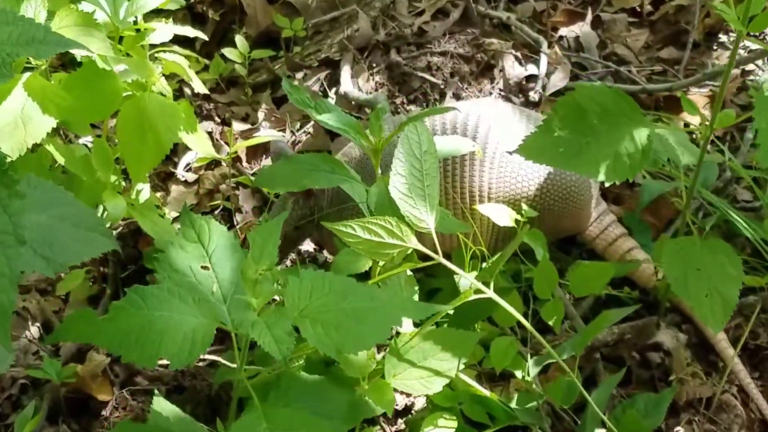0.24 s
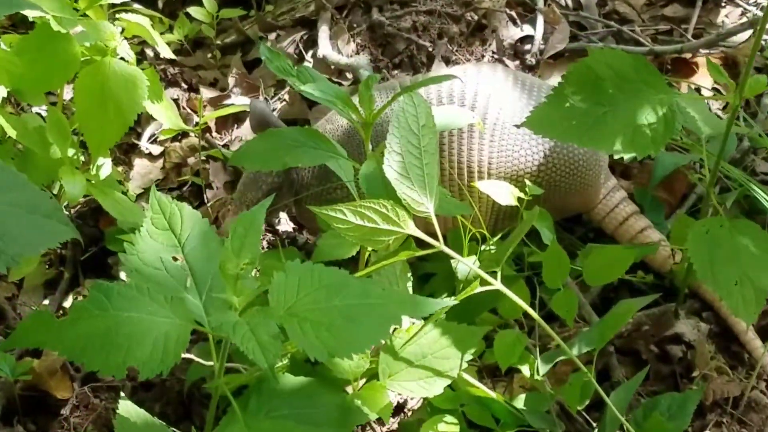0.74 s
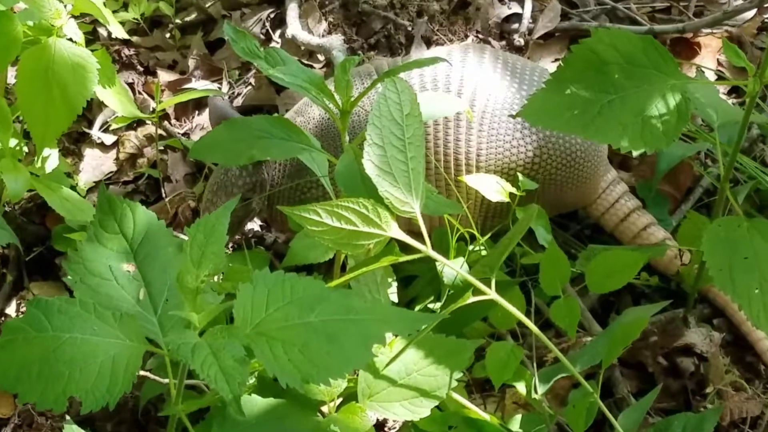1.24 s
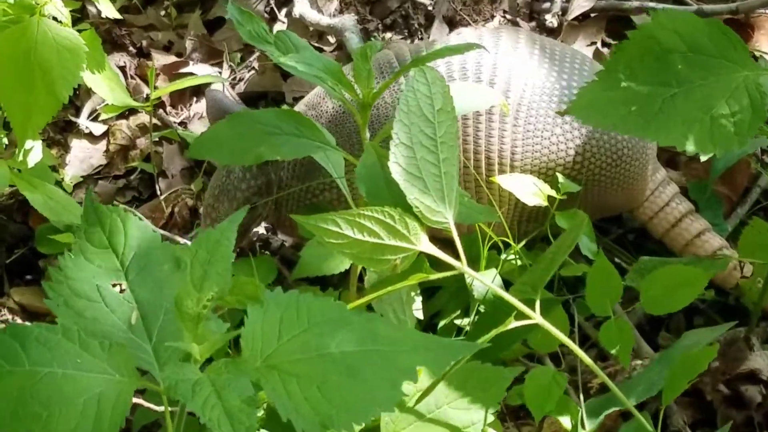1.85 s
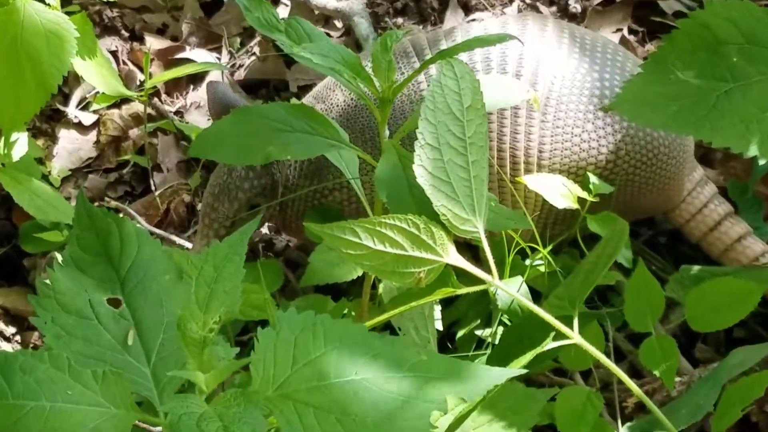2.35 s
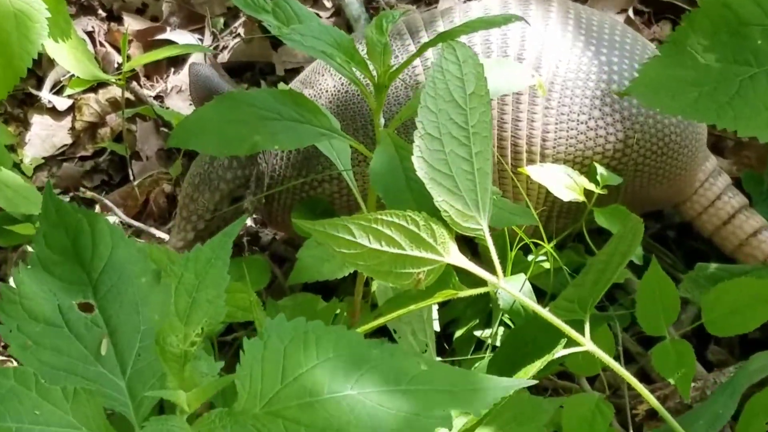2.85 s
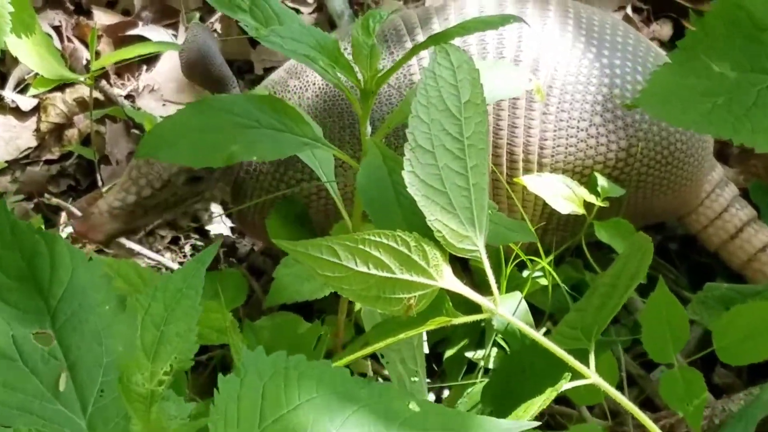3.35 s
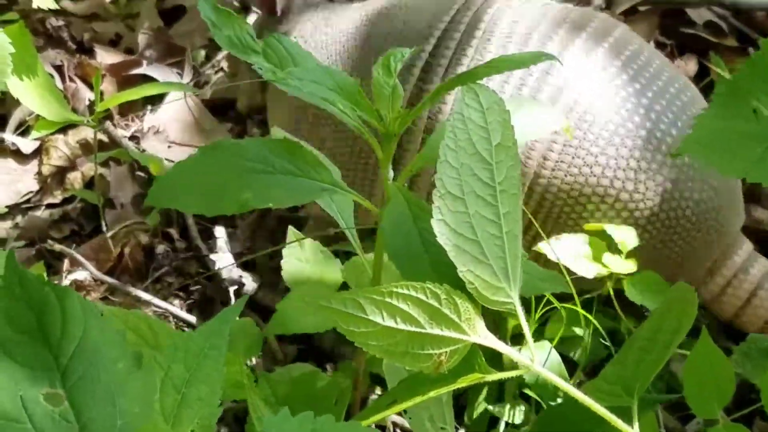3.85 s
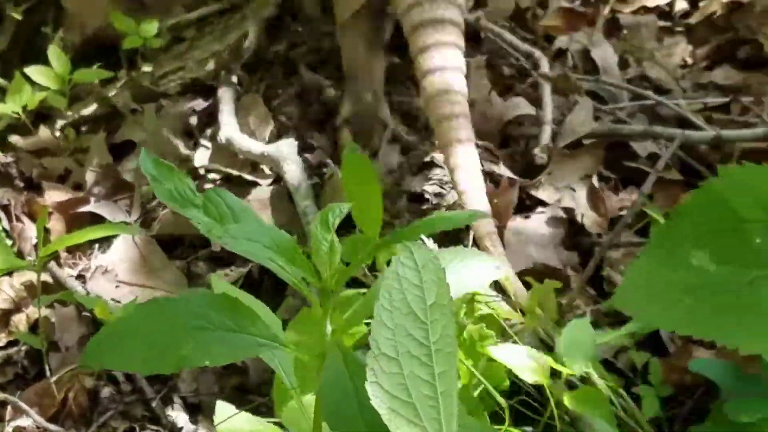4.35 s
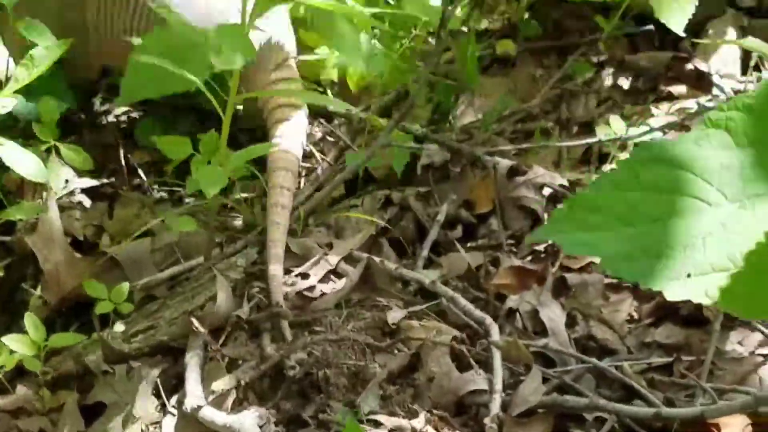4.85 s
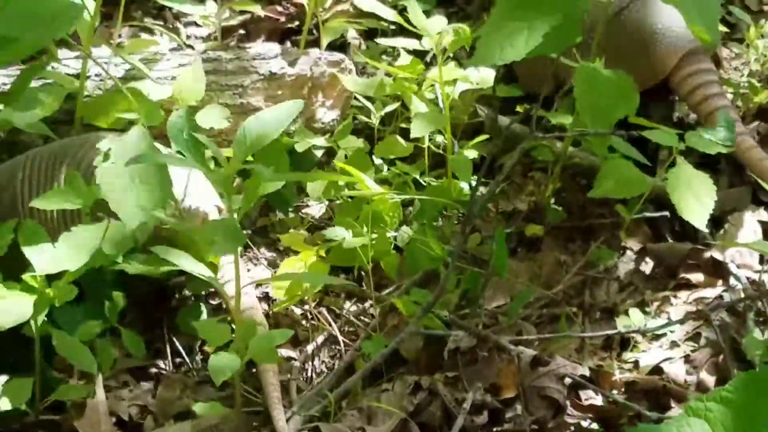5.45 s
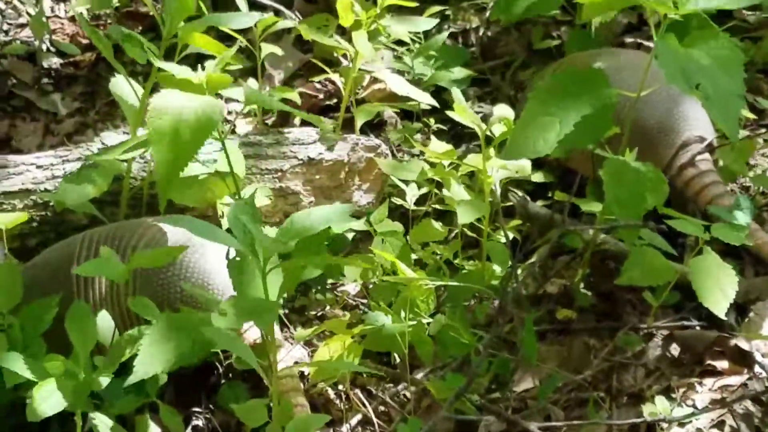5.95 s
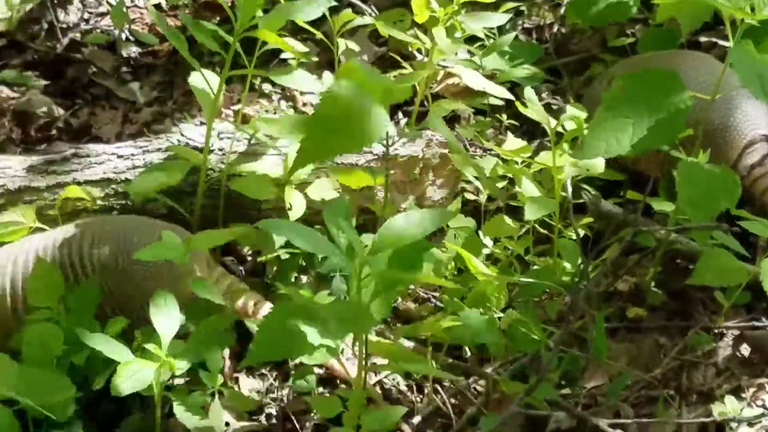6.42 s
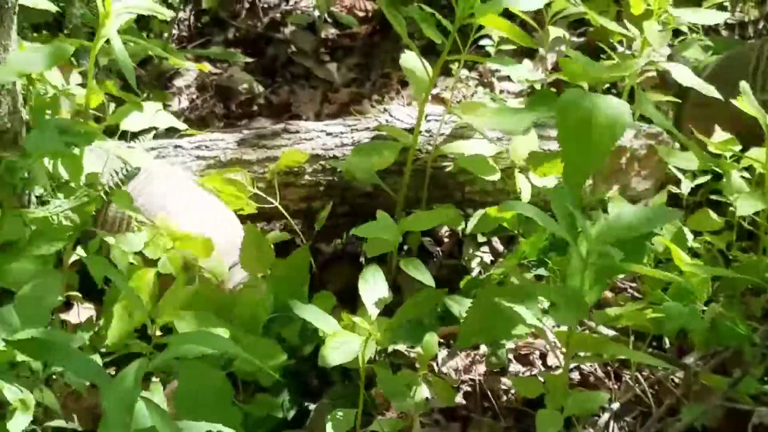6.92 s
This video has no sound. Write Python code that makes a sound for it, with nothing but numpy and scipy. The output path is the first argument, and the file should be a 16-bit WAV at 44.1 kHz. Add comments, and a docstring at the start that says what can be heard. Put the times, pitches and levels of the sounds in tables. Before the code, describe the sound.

Two armadillos root through dry leaf litter in a wood, a metre or two from a hand-held microphone. The leaves scrape and crackle in uneven bursts, dotted with small snaps of stems and twigs. The rustling grows busier about halfway, then carries on as the animals move off through the plants. Behind it are a faint woodland murmur, light puffs of wind and two very faint passing hums.

```python
"""Two armadillos root and shuffle through dry leaf litter, a metre or two from a hand-held microphone pair.
The leaves scrape and crackle in swarms of tiny breaks; stems and twigs snap with a short ring.
There is one tap on the microphone and a few soft knocks. Behind lies the far murmur of the wood;
puffs of wind cross the microphone ports, and two faint low hums, perhaps insects in flight, pass by."""
import sys
import numpy as np
from scipy import signal
from scipy.fft import rfft, irfft
from scipy.io import wavfile
from scipy.ndimage import uniform_filter1d, map_coordinates

SR = 44100
rng = np.random.default_rng(int(sys.argv[2]) if len(sys.argv) > 2 else 0)


def inscribe(sig):
    """Save sig as 16-bit PCM at rate SR to the path in sys.argv[1].

    A 1-D sig is mono; a 2-D sig holds one channel per row.
    Samples are clipped to [-1, 1] before scaling.
    """
    pcm = np.round(np.clip(np.atleast_2d(sig).T, -1, 1) * 32767)
    wavfile.write(sys.argv[1], SR, pcm.astype(np.int16))


N = 316638

# Leaf colour while rooting close by (frequency [Hz], level [dB])
ROOTING_COLOUR = [(180, -21.5), (300, -12), (411, -10.5), (622, -5), (1010, -4.5), (1400, -7), (1890, -2.5),
                  (2270, -3.5), (3440, -8.5), (5380, -10), (7370, -3), (9610, -11.5), (10800, -13),
                  (14300, -6.5), (15800, -12.5)]
# Leaf colour while walking off through the plants (frequency [Hz], level [dB])
WALKING_COLOUR = [(88, -47), (150, -10), (213, -20.5), (321, -8.5), (587, -5.5), (801, -2), (1250, -5),
                  (1930, -2.5), (2960, -11), (4280, -5.5), (5960, -10), (7990, -3), (9900, -18),
                  (12800, -7.5), (15800, -11.5)]
# Bearing of the busier animal (time [s], lag at the left port [ms])
LEFT_LAG = [(0.2, 0.061), (.75, -0.049), (1.25, 0.038), (1.75, -0.079), (2.75, -0.078), (3.3, -0.1),
            (3.75, -0.014), (4.75, 0.077), (5.25, 0.039), (5.75, -0.095), (6.3, -0.1), (7.1, 0.015)]
TURN_S = (3.5, 3.65)   # start and end of the near animal's turn away


def from_db(db):
    """Decibels to amplitude gain."""
    return 10 ** (np.asarray(db) / 20)


def in_time(rows):
    """One automation curve for each column after the time."""
    times, *columns = np.transpose(rows)
    return [np.interp(np.arange(N) / SR, times, column) for column in columns]


def at_hz(points, hz):
    """Read a curve along a log frequency axis."""
    point_hz, values = np.transpose(points)
    return np.interp(np.log(hz), np.log(point_hz), values)


def sides(pan_db):
    """Left and right gains for a left-minus-right level."""
    return from_db(np.array([pan_db / 2, -pan_db / 2]))


def band(x, low_hz, high_hz):
    """Gentle band-pass."""
    return signal.sosfilt(signal.butter(2, [low_hz, high_hz], "band", fs=SR, output="sos"), x)


def drift(rate_hz):
    """Smooth random wander of rms 1."""
    step, settle = 40, 2000
    pole = np.exp(-2 * np.pi * rate_hz * step / SR)
    noise = rng.standard_normal(N // step + settle + 2)
    slow = signal.lfilter([1], [1, -2 * pole, pole * pole], noise)[settle:]
    return np.interp(np.arange(N) / step, np.arange(len(slow)), slow / np.sqrt(np.mean(slow ** 2)))


def stereo_noise(colour):
    """Coloured noise, narrow in the low mids and wide at both extremes; the mono mix has rms 1."""
    # Likeness of left and right (frequency [Hz], correlation [0-1])
    likeness = [(30, .04), (70, .45), (130, .66), (500, .82), (1000, .6), (3000, .5), (12000, 0.2)]
    hz = np.maximum(np.fft.rfftfreq(N, 1 / SR), 1)
    alike = at_hz(likeness, hz)
    mid, side = rfft(rng.standard_normal((2, N))) * from_db(at_hz(colour, hz))
    pair = irfft(np.sqrt(1 + alike) * mid + np.sqrt(1 - alike) * side * [[1], [-1]], N)
    return pair / np.std(pair.mean(axis=0))


def wood_murmur(level_db=-58):
    """The distant wood: a steady bed of noise."""
    # Colour of the murmur (frequency [Hz], level [dB])
    murmur_colour = [(15, -32), (25, -2), (53, 11), (527, 19), (1360, -9), (2030, 20), (6490, -4.5),
                     (7830, -53), (10300, -58), (12700, -14), (15800, 23)]
    return from_db(level_db) * stereo_noise(murmur_colour)


def wind(breeze_db=-74.5, pan_db=5.0):
    """Air buffets the microphone ports: a lumpy low breeze, with gusts that swell and fade."""
    # Colour of the rumble (frequency [Hz], level [dB])
    rumble_colour = [(15, -30), (30, -7), (45, -8), (80, -4.5), (110, -5), (170, -7.5), (250, -18),
                     (400, -42)]
    # Puffs of wind (start [s], swell [s], fade [s], top level [dB])
    gusts = [(2.19, 0.045, 0.097, -61), (4.22, .06, .1, -65), (4.3, 0.5, 0.72, -53),
             (6.96, 0.15, .15, -64.5)]
    t = np.arange(N) / SR
    gust_db = sum(np.interp(t, np.cumsum(times), [0, top_db - breeze_db, 0]) for *times, top_db in gusts)
    level = from_db(breeze_db + gust_db + 1.7 * drift(6.1))
    return level * stereo_noise(rumble_colour) * sides(pan_db)[:, None]


def wing_hums():
    """Wing beats: a low tone and its octave, wavering a little in pitch and level."""
    # Passing hums (start [s], end [s], pitch [Hz], fundamental level [dB], octave level [dB])
    flights = [(2.253, 2.51, 187, -60.5, -66.5), (4.675, 5.63, 134.3, -66.5, -81)]
    out, t = 0, np.arange(N) / SR
    for start, end, hz, level_db, octave_db in flights:
        phase = 2 * np.pi * np.cumsum(hz * (1 + 0.0015 * drift(3.8))) / SR
        fade_in, fade_out = (t - start) / 0.02, 3.3 * (end - t) / (end - start)
        swell = np.clip(np.minimum(fade_in, fade_out), 0, 1) * from_db(0.82 * drift(4.0))
        tone = from_db(level_db) * np.sin(phase) + from_db(octave_db) * np.sin(2 * phase)
        out = out + np.sqrt(2) * swell * tone
    return out


def low_thuds(attack_s=0.001):
    """A tap on the microphone at the left, then soft knocks: each a few cycles of a damped low ring."""
    # Low thuds (time [s], level [dB], pitch [Hz], t60 [s], left minus right [dB])
    thuds = [(2.209, -50, 105, .09, 21), (4.27, -30, 380, 0.044, 0), (4.287, -29, 303, 0.024, -2),
             (5.306, -39.5, 250, 0.023, -2)]
    out, t = np.zeros((2, N)), np.arange(SR // 5) / SR
    for start, level_db, hz, t60, pan_db in thuds:
        envelope = from_db(level_db - 60 * t / t60) * np.minimum(t / attack_s, 1)
        ring = np.sin(2 * np.pi * hz * t) * envelope
        out[:, int(start * SR):int(start * SR) + len(t)] += sides(pan_db)[:, None] * ring
    return out


def sharp_clicks(middle_db=-19.5, ring_lift_db=8.5, ring_octaves=0.87, crest_db=6):
    """Snapping stems, and one tap on the microphone at 2.21 s: each a noise burst with a short ring."""
    # Sharp clicks (time [s], level [dB], ring [Hz], relative bass below 1.2 kHz [dB],
    # relative treble above 6 kHz [dB], left minus right [dB], t60 [s])
    clicks = [(0.068, -8.5, 1010, -17.5, -14.5, -6, 0.0064), (0.077, -24, 2200, -38, -11, -4, 0.015),
              (0.101, -32, 4340, -21, -10, -2.5, 0.014), (0.124, -22.5, 3150, -29, -21, -8, 0.014),
              (0.144, -32.5, 4150, -34, -8, -2.5, 0.014), (0.175, -30, 4410, -30, -12, -7, 0.012),
              (0.319, -30, 2670, -23, -9, -5, 0.013), (0.344, -32, 2680, -13, -7, -2, 0.016),
              (0.357, -25.5, 1020, -21, -9.5, -5, 0.025), (0.377, -23.5, 1870, -27, -20, 1, 0.015),
              (0.401, -28, 1090, -16.5, -15, -1.5, 0.017), (0.423, -32.5, 2070, -14, -0.5, -5, 0.0091),
              (0.452, -38, 2040, -24, -3, -6, 0.012), (0.509, -22.5, 1910, -20.5, -15, -6, 0.012),
              (0.512, -27, 1910, -25, -15, -11, 0.013), (0.544, -31, 4750, -13, -16, -1.0, 0.015),
              (0.607, -30.5, 592, -8.5, -13, -3, 0.013), (0.633, -32, 4160, -22, -13, -1.5, 0.019),
              (0.658, -28.5, 2590, -27, -15, -2.5, 0.013), (0.676, -26.5, 1930, -33, -13, -2.0, 0.03),
              (0.706, -26.5, 2180, -25, -29, -6, 0.0093), (0.785, -28.5, 589, -16, -12.5, -6, 0.017),
              (0.819, -32.5, 4070, -20, -9, -1.5, 0.024), (0.876, -28, 2100, -33, -18, -3.5, 0.014),
              (0.901, -27.5, 2330, -22, -11.5, -4, 0.015), (1.003, -28.5, 2280, -27, -10, -4, 0.017),
              (1.075, -36, 2530, -21, -7, -2.0, 0.019), (1.392, -22.5, 2480, -28, -16, -6, 0.011),
              (1.403, -29.5, 3080, -28, -14, -11, 0.02), (1.468, -29, 2290, -21, -28, -7, 0.016),
              (1.492, -28, 2510, -21, -15, -4, 0.02), (1.511, -27, 1990, -12, -10.5, -4, 0.015),
              (1.553, -28, 2040, -23, -16, -5, 0.018), (1.563, -22.5, 1740, -21, -25, -6, 0.013),
              (1.595, -25.5, 3120, -34, -7.5, -7, 0.015), (1.626, -26.5, 2570, -12, -19, -8, 0.012),
              (1.759, -14, 2060, -24, -18.5, -6.5, 0.013), (1.781, -21, 2590, -30, -20, -9, 0.014),
              (1.825, -33, 3290, -28, -22, -9, 0.015), (1.881, -22, 2310, -30, -16, -2.5, 0.015),
              (1.935, -25, 1850, -32, -13, -9, 0.015), (1.982, -24.5, 2550, -20.5, -23, -10, 0.015),
              (2.027, -22, 2250, -36, -36, -8, 0.024), (2.042, -26, 2350, -19, -13, -7, 0.012),
              (2.13, -25.5, 2510, -24, -16, -7, 0.0083), (2.151, -39, 2450, -31, -16, -9, 0.015),
              (2.209, -17, 580, -19.5, -26, 13, 0.018), (2.245, -27, 3130, -19, -16, -6, 0.012),
              (2.283, -25.5, 2350, -31, -13, -6, 0.015), (2.318, -23.5, 2000, -20, -12, -7, 0.025),
              (2.355, -21.5, 2670, -20, -25, -3, 0.015), (2.371, -19.5, 2700, -37, -14.5, -6, 0.022),
              (2.399, -24, 1770, -34, -26, -2.0, 0.015), (2.419, -20.5, 1740, -32, -20, -6, 0.013),
              (2.436, -15.5, 2400, -22.5, -15.5, -6, 0.012), (2.504, -19, 2240, -19.5, -16, -5.5, 0.032),
              (2.559, -37, 2130, -22, -7, -16, 0.015), (2.601, -22.5, 2200, -36, -22, -12, 0.013),
              (2.621, -23.5, 2600, -31, -15, -9, 0.018), (2.723, -28.5, 2160, -25, -16, -8, 0.013),
              (2.755, -25.5, 912, -20, -17, -9, 0.015), (2.858, -35, 3000, -29, -10, -4.5, 0.015),
              (2.916, -28, 1950, -14, -19, -10, 0.012), (2.96, -30, 2310, -19, -33, -8, 0.017),
              (3.065, -26.5, 2540, -29, -20, -8, 0.013), (3.181, -38, 2150, -7, -7, -4, 0.015),
              (3.211, -23, 2250, -23, -16, -9, 0.015), (3.279, -26.5, 2340, -25, -18, 4, 0.021),
              (3.309, -22.5, 2030, -33, -23, -4, 0.018), (3.359, -28, 3270, -21, -14, -3.0, 0.02),
              (3.387, -30, 2260, -34, -9, -10, 0.015), (3.407, -15, 2230, -32, -19, -6, 0.018),
              (3.459, -22, 2100, -36, -13, -5, 0.015), (3.479, -25, 2460, -17.5, -11, -4, 0.02),
              (3.658, -20.5, 5000, -28, -30, 6, 0.032), (3.743, -22, 5220, -21, -17, 6, 0.021),
              (3.762, -20.5, 4600, -20.5, -18, -5, 0.021), (3.784, -11.5, 4260, -31, -28, -4, 0.024),
              (3.841, -19, 4230, -37, -29, -1.0, 0.013), (3.878, -15, 4160, -37, -35, -4, 0.009),
              (3.883, -15, 1020, -16, -30, -7, 0.017), (3.914, -24, 3430, -18, -21, -1.5, 0.019),
              (3.943, -21, 1200, -18, -19, -3, 0.015), (3.964, -22, 5200, -18, -16, -1.0, 0.015),
              (3.972, -17.5, 4640, -21, -15.5, -2, 0.023), (3.981, -18, 4740, -23, -16, -3, 0.025),
              (4.075, -27, 1630, -15, -7, -9, 0.012), (4.099, -25.5, 4200, -19, -13, 1, 0.013),
              (4.161, -26, 1870, -12, -22, -3, 0.017), (4.197, -26, 4790, -28, -21, -4, 0.02),
              (4.22, -20.5, 4570, -15.5, -25, -1.5, 0.016), (4.243, -31, 4240, -16, -11, 0, 0.022),
              (4.404, -26.5, 1990, -31, -27, 1, 0.01), (4.443, -27, 2220, -33, -26, -11, 0.022),
              (4.473, -27, 2160, -27, -16, -8, 0.014), (4.487, -19.5, 2630, -28, -15, -7, 0.0095),
              (4.555, -29.5, 4500, -38, -12, -8, 0.015), (4.63, -29, 4140, -16, -12, -7, 0.02),
              (4.723, -31, 4020, -16, -16, -4.0, 0.015), (4.811, -38, 2100, -27, -13, -4, 0.016),
              (4.879, -31.5, 1670, -24, -19, -5, 0.0083), (4.943, -25, 2290, -33, -23, -8, 0.017),
              (4.959, -30, 3740, -37, -17, -12, 0.015), (5.027, -22, 4140, -23.5, -25, -8, 0.021),
              (5.135, -37.5, 1490, -21, -4, -7, 0.015), (5.273, -35.5, 1980, -23, -17, -3, 0.015),
              (5.329, -29, 4360, -32.5, -17, -4, 0.015), (5.373, -34, 4380, -23, -9.5, -2.5, 0.012),
              (5.671, -25, 2430, -34, -14, 0.0, 0.031), (5.768, -30, 2060, -25, -14, -11, 0.015),
              (5.805, -30.5, 2710, -34, -31, -12, 0.02), (5.936, -35.5, 4160, -15, -7, -7, 0.015),
              (6.073, -31.5, 4200, -43, -12, 2, 0.025), (6.143, -32, 1640, -23, -12, 1, 0.02),
              (6.212, -22, 1160, -24, -21, -1.0, 0.017), (6.326, -28.5, 1960, -17, -12, -3, 0.02),
              (6.386, -26, 4550, -22, -9.5, -7, 0.021), (6.396, -25.5, 2820, -27, -13, -7, 0.022),
              (6.456, -30, 2060, -30, -11, 1, 0.018), (6.518, -25, 2170, -22, -19, -7, 0.025),
              (6.625, -31, 4200, -28, -19, 0, 0.018), (6.664, -26.5, 3990, -19, -18, -1.5, 0.017),
              (6.735, -23, 4650, -15, -25, 1, 0.01), (6.762, -25.5, 598, -14.5, -19, -5, 0.01),
              (6.899, -28, 902, -13, -20, -3, 0.015), (6.989, -37, 5400, -27, -9, -12, 0.015),
              (7.044, -31, 4930, -20, -12, -5, 0.017), (7.116, -36, 5060, -25, -7, -7, 0.018),
              (7.134, -32, 4560, -20, -21, -8.5, 0.015), (7.164, -21.5, 4260, -17, -21, -4, 0.026)]
    # Crossovers of the five click bands (frequency [Hz])
    edges = [300, 1200, 3000, 6000, 10000, 16000]
    start, level_db, ring_hz, bass_db, treble_db, pan_db, t60 = np.transpose(clicks)[..., None]
    size, click_length = 2048, SR // 25
    t, hz = np.arange(size) / SR, np.maximum(np.fft.rfftfreq(size, 1 / SR), 1)
    noise = rng.standard_normal((len(clicks), 3, size))
    crack = (noise[:, :1] + .5 * noise[:, 1:]).transpose(1, 0, 2)   # mostly shared by left and right
    rise = np.minimum(t / (0.05 * t60), 1) ** 2   # slow crunches also swell slowly
    envelope = rise * (from_db(-60 * t / t60) + .04 * from_db(-60 * t / .04))
    tuning, q = hz / ring_hz, ring_hz / 550   # higher pieces ring sharper
    ring = 1 + 1.5 / (1 + 1j * q * (tuning - 1 / tuning))   # one resonance over a flat crack
    colour = from_db(np.where(start < TURN_S[1], at_hz(ROOTING_COLOUR, hz), at_hz(WALKING_COLOUR, hz)))
    lag_s = np.interp(start, *np.transpose(LEFT_LAG)) / 1000 + rng.normal(0, .000015, start.shape)
    delay_s = np.array([lag_s, 0 * lag_s]) + .0002   # the nearer port hears it first
    arrival = np.exp(-2j * np.pi * hz * delay_s)
    pair = irfft(rfft(crack * envelope) * ring * colour * arrival) * sides(pan_db)
    bursts = 0
    for k, (low, high) in enumerate(zip(edges, edges[1:])):
        part = band(band(pair, low, high), low, high)[..., :click_length]
        attack = part[..., :SR // 100]   # each band is levelled on its first 10 ms
        strength = np.std(attack.mean(axis=0), axis=1) + .3 * np.std(attack, axis=(0, 2))
        octaves_off = np.log2(np.sqrt(low * high) / ring_hz)
        body_db = middle_db + ring_lift_db * np.exp(-(octaves_off / ring_octaves) ** 2)
        band_db = [bass_db, body_db, body_db, treble_db, treble_db + 0.5][k]
        bursts = bursts + part / strength[:, None] * from_db(level_db + band_db - crest_db)
    out = np.zeros((2, N + size))
    for onset, burst in zip(start[:, 0], bursts.transpose(1, 0, 2)):
        out[:, int(onset * SR):int(onset * SR) + click_length] += burst
    return out[:, :N]


def leaf_breaks(per_s, spread_db, t60, clump_db):
    """Power envelope of a swarm of tiny breaks: clumped in time, a few large, all dying fast."""
    born = rng.random(N) < per_s * from_db(clump_db * drift(25.0)) / SR
    impulses = born * from_db(2 * spread_db * np.minimum(rng.exponential(1, N), 2.9))
    power = signal.lfilter([1], [1, -from_db(-120 / (t60 * SR))], impulses + 1e-18)
    local_mean = uniform_filter1d(power, SR // 6) + 0.13 * power.mean()
    return 1.28 * power / local_mean   # mean near 1, so the animal's stroke sets the level


def leaf_rustle(pan_db=-5.5):
    """Armadillos rub the leaves: each band mixes scrape, common breaks and breaks of its own size."""
    # Shuffling strokes (time [s], level [dB], brightness [dB])
    strokes = [(0, -42.5, 2.5), (.05, -48.5, -4), (.14, -47.5, 0.5), (.26, -52, 1.5), (.36, -42, -2),
               (.46, -49.5, 1.5), (.56, -47, -1), (.67, -43, -0.5), (.75, -52, -1.5), (.86, -46.5, -2),
               (.97, -48.5, -2), (1.1, -45.5, 1), (1.25, -49, -2), (1.37, -52.5, -2.5), (1.44, -52, -3.5),
               (1.52, -46.5, -2), (1.62, -46, 1.5), (1.74, -55.5, -2), (1.78, -48, 1), (1.9, -42.5, 1.5),
               (2.04, -47, 0), (2.16, -50.5, -0.5), (2.26, -50, 0.5), (2.36, -44.5, -0.5), (2.44, -43.5, 3),
               (2.48, -48, 0.5), (2.6, -47.5, -0.5), (2.7, -53.5, 0), (2.74, -48, -1), (2.83, -51, -0.5),
               (2.94, -46.5, -2), (3.0, -54.5, -3), (3.07, -47.5, -0.5), (3.14, -50.5, -1), (3.24, -42, -2),
               (3.36, -42, 0), (3.46, -38.5, -0.5), (3.62, -43, 1), (3.68, -40, 2), (3.72, -45, 2),
               (3.9, -41, 0), (4.14, -44.5, 0), (4.23, -37, 1), (4.37, -46, -2), (4.42, -42.5, 1),
               (4.52, -52, 1), (4.74, -41, 2), (4.84, -51, 1), (4.95, -47, 0.5), (5.0, -50, 2),
               (5.1, -51.5, 0.5), (5.16, -45.5, 2), (5.27, -52.5, 1), (5.36, -49, 0), (5.5, -54, 0),
               (5.65, -51.5, -0.5), (5.7, -48.5, 1.5), (5.9, -55.5, -2.5), (5.98, -47, -0.5),
               (6.1, -52.5, 1.5), (6.18, -43.5, 3), (6.3, -46.5, -1.5), (6.42, -46, 2), (6.57, -45, 1.5),
               (6.73, -42.5, 0.5), (6.86, -49, 2), (6.91, -43.5, 2.5), (7.0, -55, 3), (7.12, -47.5, 0.5),
               (7.18, -41, 2.5)]
    # Swish at 3.2-6 kHz against the rest of the rustle (time [s], level [dB])
    swish = [(0, -1), (.4, -0.5), (1.1, -2), (1.5, -1.5), (2.3, 2.5), (3.2, 0), (3.7, -1.5), (4.2, -1.5),
             (4.7, -0.5), (5.5, -2), (6.1, 1.5), (6.5, -1), (6.72, 0.5), (6.9, -1), (7.18, 2)]
    # Crackle against scrape, lower as the animals move off (time [s], share of breaks [0-1])
    brittleness = [(0, 0.36), (1, 0.3), (2, 0.54), (3, 0.33), (3.7, 0.11), (4.4, 0.3), (5, 0.25),
                   (5.8, 0.25), (6.5, 0.14), (7.18, 0.32)]
    # Band trims, bass first (level [dB])
    trim_db = [-2, -5, -3, -2, 3, -10, 0.5]
    # How each band follows the brightness, bass first (slope [dB per dB])
    tilt = [-.9, -.6, -.3, 0, .4, .8, .9]
    edges = [150, 450, 1200, 1900, 3200, 6000, 9500, 16500]   # crossovers [Hz]
    level_db, bright_db = in_time(strokes)
    swish_db, = in_time(swish)
    brittle, = in_time(brittleness)
    away = np.interp(np.arange(N) / SR, TURN_S, [0, 1])
    scrape = np.sqrt(1 - away) * stereo_noise(ROOTING_COLOUR)
    scrape += np.sqrt(away) * stereo_noise(WALKING_COLOUR)
    lag_samples = in_time(LEFT_LAG)[0] * SR / 1000
    scrape[0] = map_coordinates(scrape[0], [np.arange(N) - lag_samples], order=5, mode="mirror")
    common = leaf_breaks(per_s=350, spread_db=1.5, t60=0.017, clump_db=8)
    sized = [leaf_breaks(per_s=200, spread_db=10.5, t60=0.0033 + 0.77 / hz, clump_db=6) for hz in edges]
    patch_db = [2.0 * drift(14.2) for _ in edges]   # each leaf has its own colour
    out = 0
    for k, (low, high) in enumerate(zip(edges, edges[1:])):
        crackle = 1.16 * common + 0.47 * (sized[k] + sized[k + 1])
        power = 1 - brittle + brittle * crackle
        colour_db = trim_db[k] + tilt[k] * bright_db + patch_db[k] + (low == 3200) * swish_db
        polarity = (-1) ** k   # alternate signs join the bands
        out = out + band(scrape * np.sqrt(power), low, high) * from_db(colour_db) * polarity
    return out * from_db(level_db) * sides(pan_db)[:, None]


def scene():
    """The stereo mix: rustle, clicks and thuds in front, hums, wind and wood behind."""
    return leaf_rustle() + sharp_clicks() + low_thuds() + wing_hums() + wind() + wood_murmur()


def record(dry):
    """The two ports differ in colour and peak near 15.6 kHz; two steep low-passes cut the top."""
    # Balance of the ports (frequency [Hz], left minus right [dB])
    balance = [(60, -5), (500, 6), (1000, 5), (3000, 2), (8000, 0), (13000, 4.5)]
    hz = np.maximum(np.fft.rfftfreq(N, 1 / SR), 1)
    lift = 1 + .5 * np.exp(-((hz - 15600) / 700) ** 2)
    ports = irfft(rfft(dry) * sides(at_hz(balance, hz)) * lift, N)
    for order, cutoff_hz in [(10, 15780), (8, 16600)]:
        ports = signal.sosfilt(signal.ellip(order, .5, 40, cutoff_hz, fs=SR, output="sos"), ports)
    return ports - .0006   # the converter's steady offset


dry = scene()
out = record(dry)
inscribe(out)
```